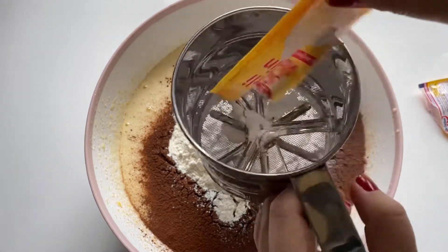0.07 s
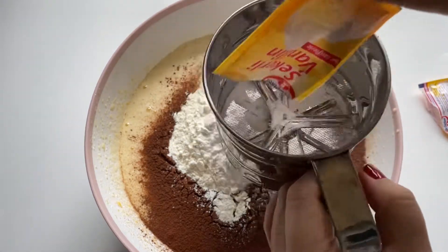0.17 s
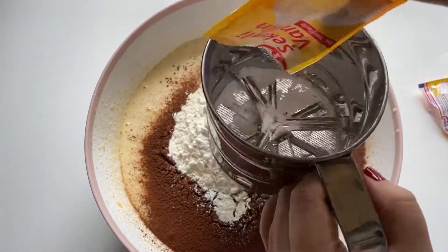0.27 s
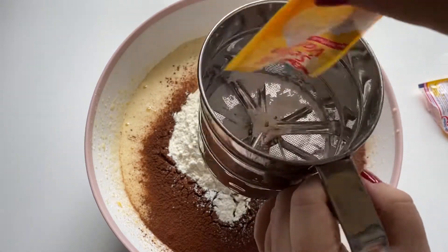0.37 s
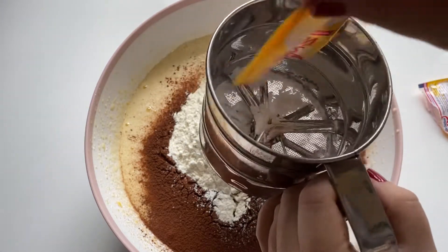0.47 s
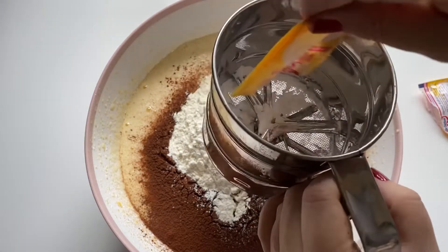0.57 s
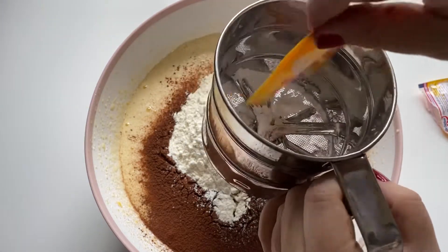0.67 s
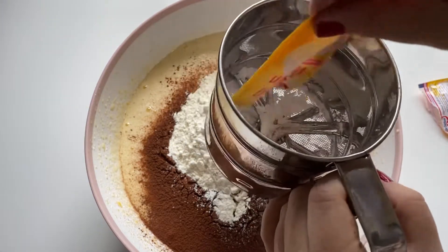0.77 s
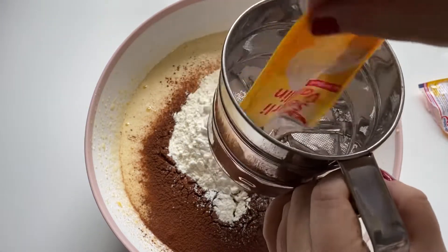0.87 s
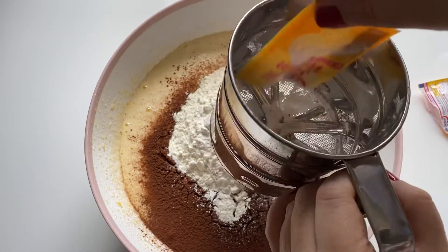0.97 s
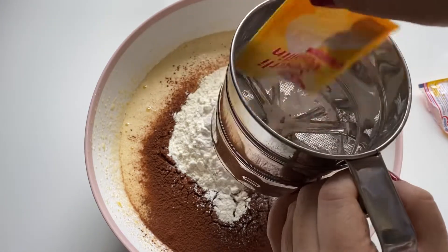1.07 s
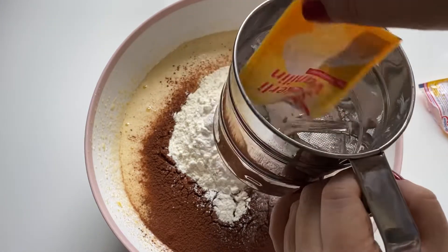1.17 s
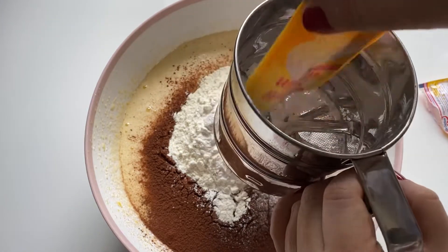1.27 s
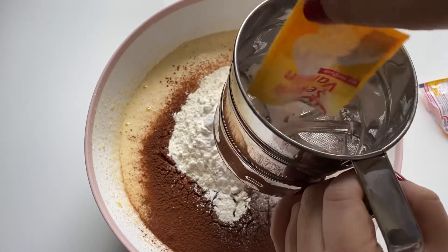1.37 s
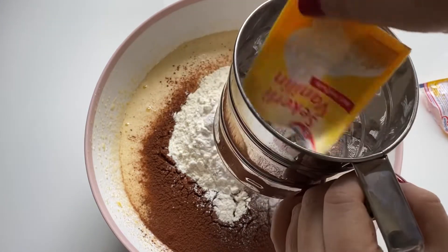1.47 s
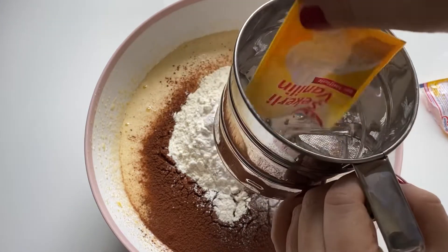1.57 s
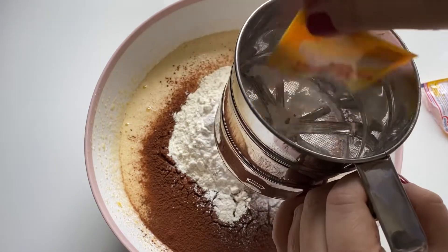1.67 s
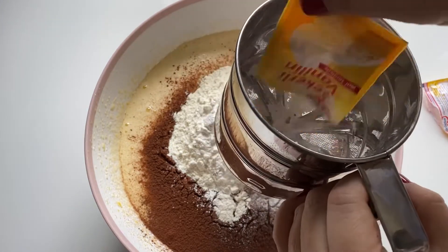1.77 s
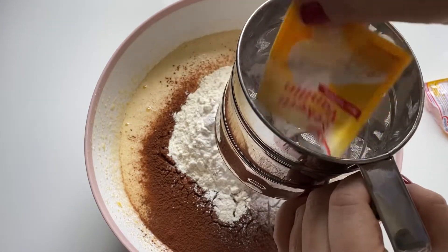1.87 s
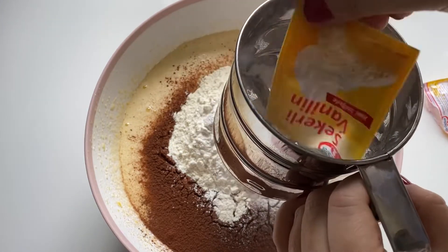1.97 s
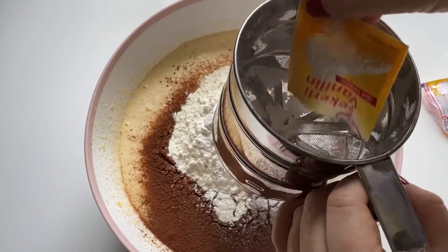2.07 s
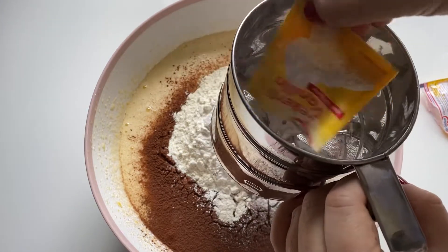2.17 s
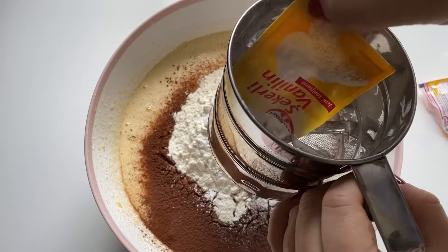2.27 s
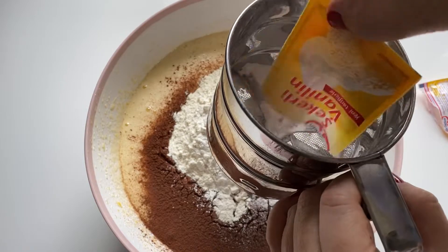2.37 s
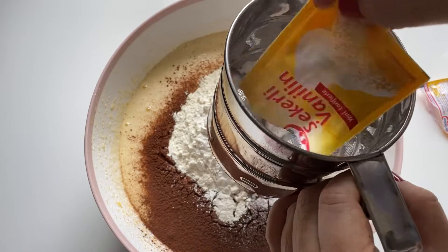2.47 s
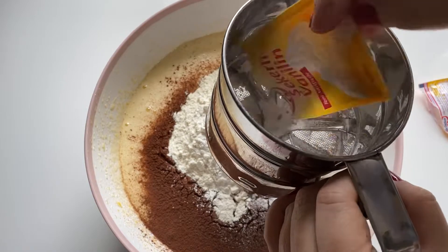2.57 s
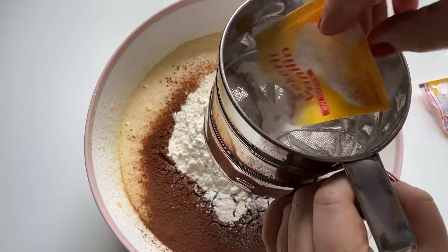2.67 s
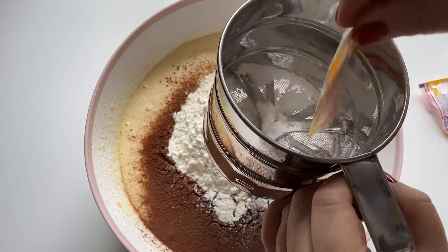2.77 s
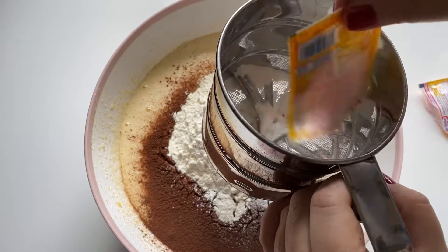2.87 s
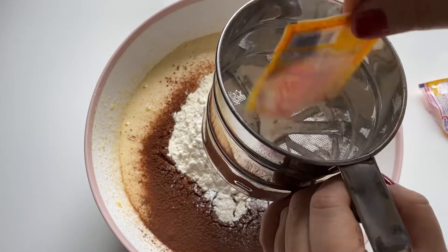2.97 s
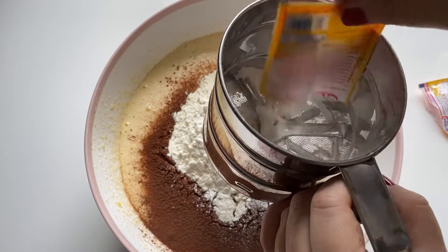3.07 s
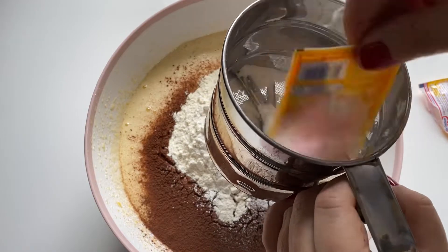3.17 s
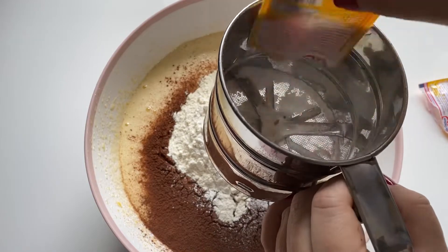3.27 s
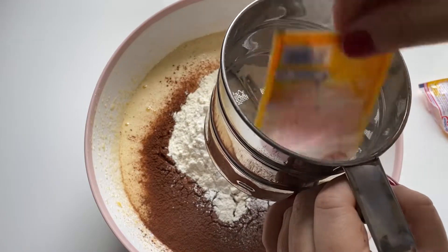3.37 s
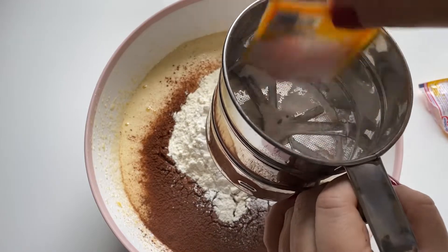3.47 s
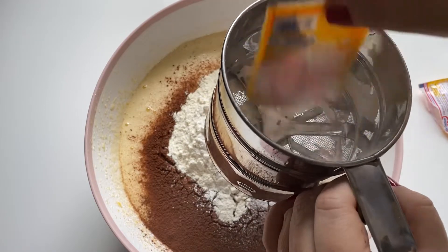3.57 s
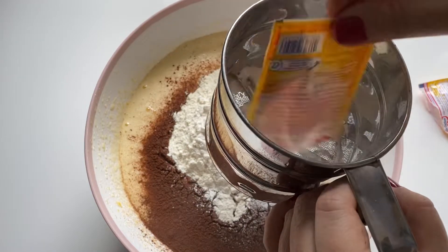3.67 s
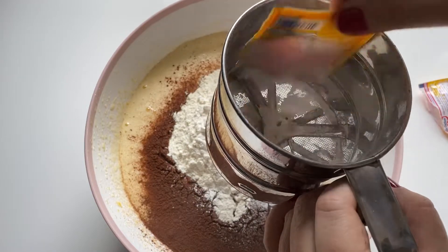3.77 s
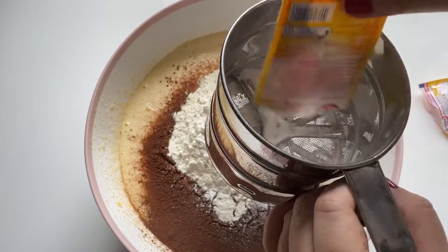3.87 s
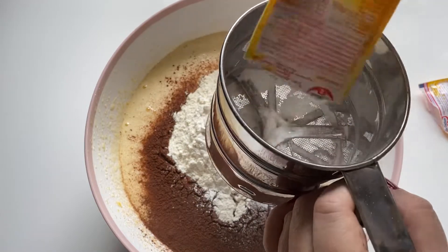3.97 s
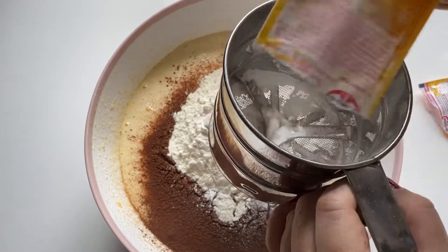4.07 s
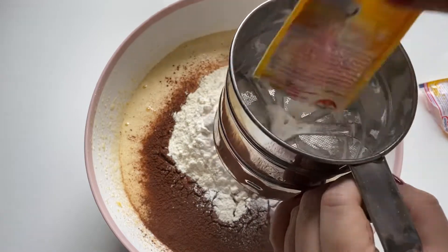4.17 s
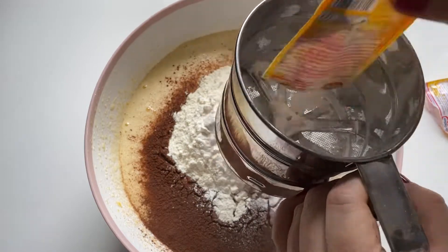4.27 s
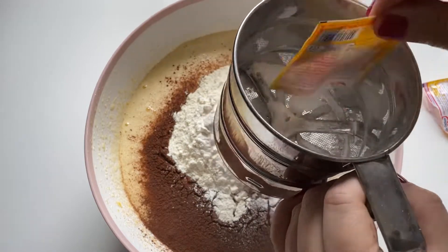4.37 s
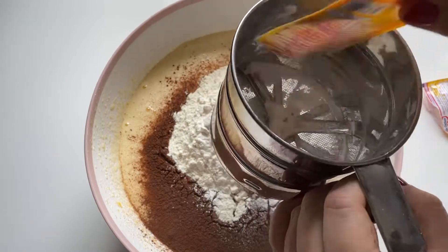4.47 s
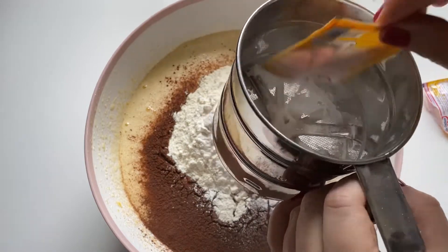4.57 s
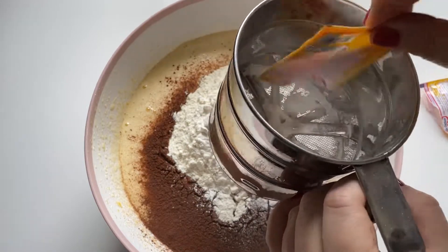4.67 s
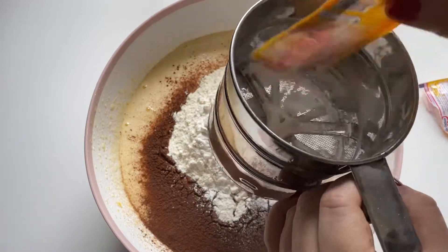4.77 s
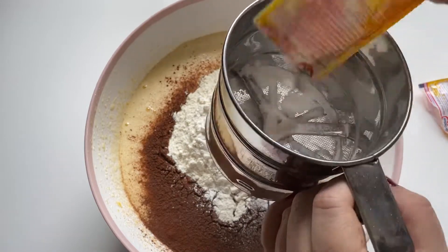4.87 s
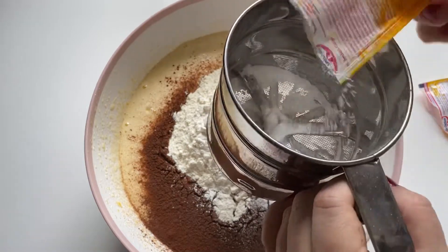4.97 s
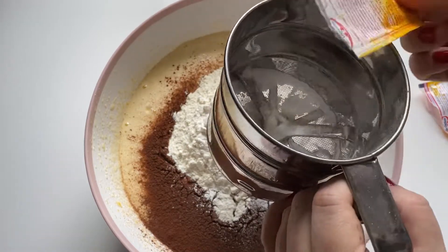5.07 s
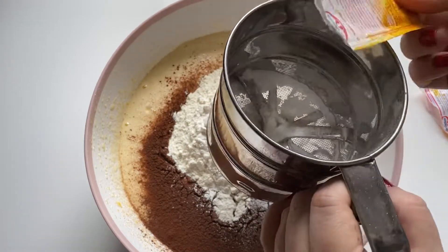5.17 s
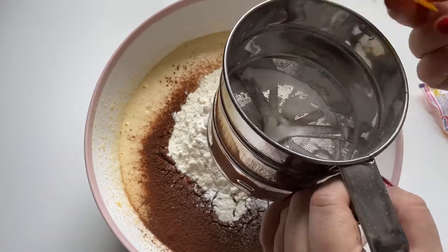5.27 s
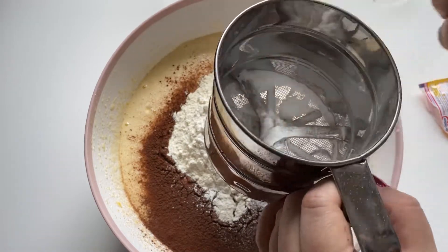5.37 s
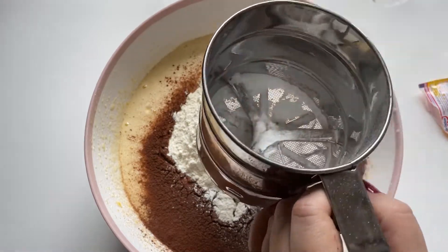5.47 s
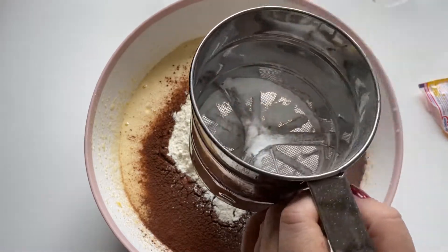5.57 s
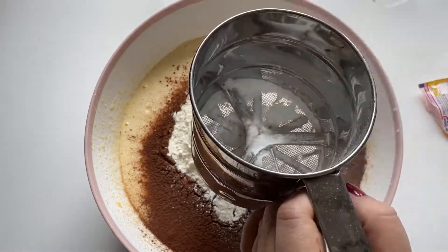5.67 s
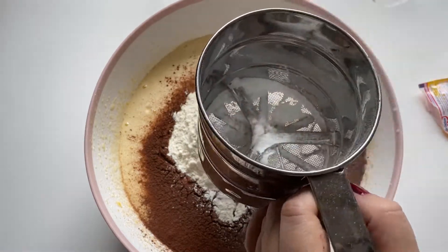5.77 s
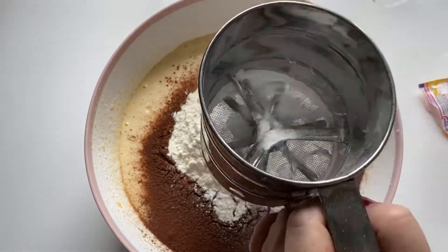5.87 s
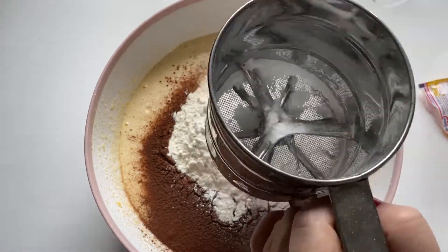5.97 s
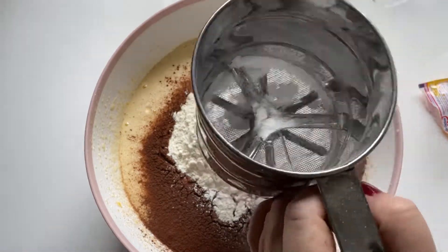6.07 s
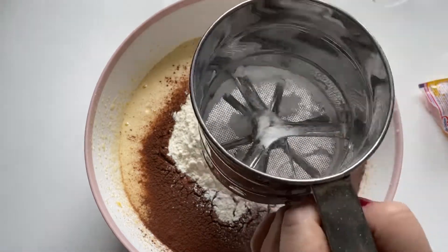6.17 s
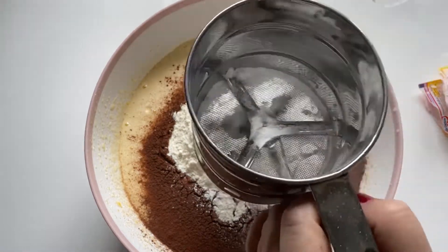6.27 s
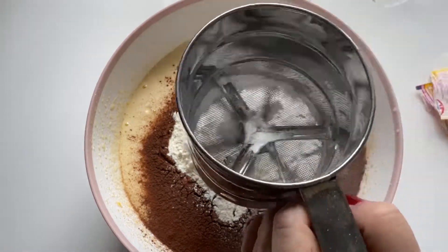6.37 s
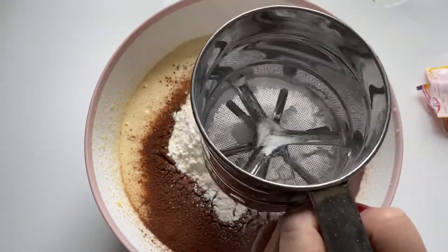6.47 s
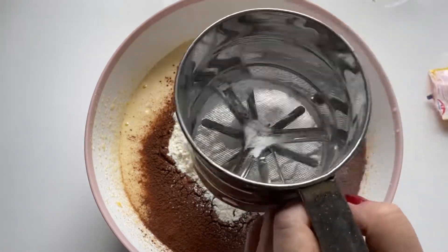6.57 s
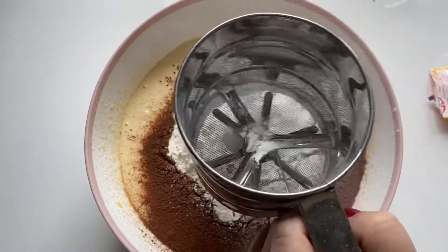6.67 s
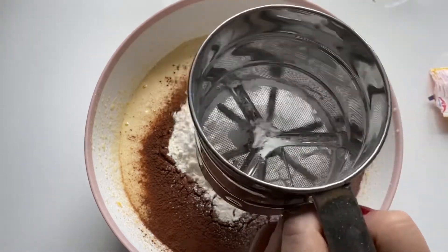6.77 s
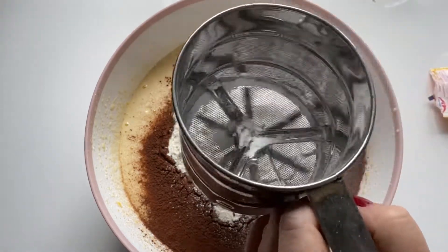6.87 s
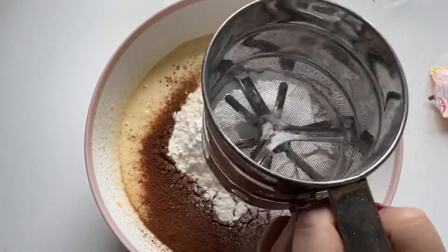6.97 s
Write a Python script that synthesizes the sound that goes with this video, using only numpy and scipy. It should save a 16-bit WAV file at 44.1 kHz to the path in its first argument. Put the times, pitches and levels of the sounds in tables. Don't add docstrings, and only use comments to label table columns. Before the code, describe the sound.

A quiet kitchen with low appliance hum and soft air noise, heard by a very close stereo microphone. From 0 to 0.9 s a paper sachet crinkles lightly with small ticks. From about 0.9 to 1.8 s it is shaken hard: rapid, bright, dry snaps, ragged rustling and a fine hiss of powder. It softens around 1.9 to 2.5 s, with sharp snaps near 2.5 s, then slight handling. From 3.0 to 3.9 s another brisk run of crackling flicks, with low soft puffs of air at about 3.2 and 3.35 s. Gentler, sliding rustles thin out until 5.1 s, leaving near quiet. At 5.8 s the metal sifter starts, far louder: about nine quick gritty rasps of wire on mesh, hard clacks near 6.03, 6.28, 6.55 and loudest at 6.8 s, each with clattering wires and brief steely ringing, then a faint last scrape near 6.9 s.

```python
import sys
import numpy as np
from scipy import signal
from scipy.fft import rfft, irfft, next_fast_len
from scipy.io import wavfile
from scipy.ndimage import uniform_filter1d, map_coordinates

SR = 44100
rng = np.random.default_rng(int(sys.argv[2]) if len(sys.argv) > 2 else 0)


def store_pcm(level_fs):
    pcm = np.round(np.clip(level_fs, -1, 1) * 32767).astype(np.int16)
    wavfile.write(sys.argv[1], SR, np.atleast_2d(pcm).T)


def gain_from_db(level_db):
    decades = np.asarray(level_db, float) / 20
    return 10 ** decades


N = 309582
T = np.arange(N) / SR

# (frequency [Hz], level [dB])
PAPER_COLOUR = [(150, -1.5), (500, -4), (800, 3), (2100, 0), (2800, -1.5), (4800, -0.5), (6300, 1),
                (8000, -27)]
# (frequency [Hz], level [dB])
POWDER_COLOUR = [(5000, -25), (7000, 3), (9500, 0), (12000, -4), (14500, -4), (16000, -10.5)]


def unit(x):
    return x / np.sqrt(np.mean(x ** 2) + 1e-20)


def along(points, hz):
    f, v = np.transpose(points)
    return np.interp(np.log(hz + 1), np.log(f + 1), v)


def filtered(x, response):
    m = next_fast_len(N + SR // 2)
    return irfft(rfft(x, m) * response(np.fft.rfftfreq(m, 1 / SR)), m)[..., :N]


def peak(f, hz, width):
    return 1j * f * width / (hz * hz - f * f + 1j * f * width)


def coloured(x, spectrum):
    return unit(filtered(x, lambda hz: gain_from_db(along(spectrum, hz))))


def wobble(rate):
    return map_coordinates(rng.standard_normal(int(N * rate / SR) + 4), [T * rate])


def grit(spread_db):
    return rng.standard_normal(N) * gain_from_db(spread_db * rng.exponential(size=N))


def add(track, s, sound):
    track[round(s * SR):][:len(sound)] += sound


def snaps():
    # (time [s], peak [dB], panel pitch [Hz], treble edge [dB], low flap [dB])
    creases = [(0.0494, -38, 1090, -17, -3), (0.0569, -30.5, 3500, -4.5, -17),
               (0.0781, -48, 5400, -5, -10.5), (0.1034, -44, 1510, -22, -13),
               (0.3658, -33.5, 3170, -28, -10), (0.4242, -34.5, 4940, -7.5, -28.5),
               (0.4806, -41.5, 1400, -25, -7), (0.489, -44, 4730, 2, -17),
               (0.5943, -42, 1130, -9, -15), (0.6454, -35.5, 1310, -5.5, -16),
               (0.7721, -50.5, 2370, -22, -3), (0.808, -45.5, 1510, -1, -5),
               (0.8343, -39, 5530, -9, -19), (0.8533, -36, 4660, -1, -15),
               (0.858, -42.5, 4720, 2, -17), (0.8705, -30.5, 4820, -5, -25),
               (0.8894, -33, 3540, -5, -27), (0.9115, -35, 2150, -8, -6.5),
               (0.9334, -22.5, 4740, -7, -36), (0.9416, -23.5, 5100, -17, -16),
               (0.9844, -34.5, 4600, -19, -34), (0.9907, -33, 4800, -18, -10),
               (1.0009, -25, 5100, -14, -22), (1.0174, -42, 1290, -12, -16),
               (1.0325, -20, 5850, -1.5, -12), (1.0626, -35.5, 1250, -8, -3),
               (1.0852, -22, 4980, 4, -34), (1.0956, -32, 4300, 0, -19), (1.109, -35, 5620, 9, -18),
               (1.1504, -30.5, 3920, 0, -29), (1.1587, -27, 3300, -0.5, -16.5),
               (1.1644, -24, 5300, -5, -15.5), (1.1738, -24, 980, 4, -8),
               (1.1846, -19, 4930, 1.5, -25), (1.2282, -27.5, 2000, -4, -9.5),
               (1.2366, -23, 5060, -6, -19), (1.2411, -24.5, 3860, 2, -15),
               (1.2945, -42, 2070, -17, -14), (1.3027, -37, 1970, -5, -2),
               (1.3074, -25.5, 2070, -13, -13), (1.3192, -21.5, 4070, -0.5, -10),
                     (1.3566, -23, 2050, -18.5, -15), (1.3657, -26, 2070, 6, -17),
                     (1.3743, -24, 5600, -4, -8), (1.4244, -37, 1430, -16, -13.5),
                     (1.4351, -27, 4740, -8, -25), (1.4396, -19.5, 5050, 3, -10.5),
                     (1.4473, -22.5, 4620, 1.5, -16), (1.4568, -23.5, 4100, -4, -17),
                     (1.51, -14, 5280, -5, -33.5), (1.524, -25, 4180, -3, -11),
                     (1.528, -22, 4870, 0.5, -14.5), (1.56, -27, 3250, -16, -35),
                     (1.5642, -24.5, 4200, -20.5, -14), (1.5766, -23.5, 4500, -7, -7),
                     (1.6229, -26.5, 2050, -5, -18), (1.631, -26, 4540, -7, -6),
                     (1.6431, -25.5, 3970, -5, -19), (1.6809, -26.5, 1760, -9, -9),
                     (1.7052, -19, 5020, -3, -12.5), (1.716, -30, 4630, -18, -13),
                     (1.7575, -34.5, 1400, -8, -4), (1.772, -27, 5060, 6, -25),
                     (1.832, -21, 2050, -2, -16.5), (1.9514, -32.5, 2090, 5, -7),
                     (2.0974, -46.5, 5160, 6, -22), (2.2273, -40, 5600, -12.5, -16),
                     (2.231, -40.5, 5340, -13, -11), (2.2837, -47, 2000, -5.5, -2.5),
                     (2.334, -33.5, 5280, -1, -1), (2.344, -43.5, 2030, -8, -13.5),
                     (2.3484, -35.5, 5270, -6, -6.5), (2.469, -39.5, 2090, -16, -9.5),
                     (2.5207, -23, 4000, 0, -12), (2.5265, -36.5, 1290, -16.5, -7.5),
                     (2.5454, -19, 5750, 9, -25.5), (2.556, -30, 5680, -6, -1),
                     (2.594, -36, 4730, -4, -21.5), (2.6696, -31.5, 4300, -11, -12),
               (2.683, -45, 5560, 1, -13), (2.6899, -36.5, 3770, -10, -11.5),
                    (2.7, -45, 3210, 1.5, -14.5), (2.7105, -47.5, 4890, 8, -7),
                    (2.822, -48.5, 2110, -20, -10), (2.8289, -43, 2100, -24.5, -3.5),
                    (2.8544, -53, 5530, 12.5, -7.5), (2.8634, -43, 3900, 6.5, -18.5),
                    (2.8827, -32.5, 4500, -4, -6.5), (2.896, -34.5, 1400, -13, -5),
                    (2.913, -45.5, 4610, 6.5, -13), (2.925, -36.5, 970, -11.5, -11),
                    (2.983, -37.5, 1520, -17, -8.5), (2.987, -37.5, 2180, -10, -11.5),
                    (2.988, -42.5, 5860, -8, -13), (3.0016, -43, 5950, 0, -6),
                    (3.0152, -35.5, 3740, 2.5, -18), (3.043, -38, 4570, -7, -20.5),
                    (3.0472, -19.5, 4370, 3.5, -31), (3.0625, -20.5, 2060, -3.5, -19),
                    (3.0702, -15, 4560, -6, -31.5), (3.1077, -29, 5730, 0.5, -16.5),
                    (3.1161, -24.5, 5700, 5, -26), (3.159, -36, 1370, -17, -15),
                    (3.1695, -26, 5000, -5.5, -15), (3.176, -42.5, 1360, -12, -2),
                    (3.181, -41, 1210, -12, -7), (3.1867, -44, 910, -18, -6),
                    (3.1931, -28.5, 4450, -1.5, -16.5), (3.253, -25.5, 3150, -6.5, -15.5),
                    (3.2637, -34, 3230, 4.5, -7.5), (3.284, -28.5, 5600, 1.5, -21.5),
                    (3.3413, -27, 5600, -5, -8), (3.3556, -28, 5760, -1, -15.5),
                    (3.3703, -30, 5020, -2, -16), (3.3877, -35, 6100, -5, -14),
                    (3.4127, -23.5, 4630, 0.5, -7), (3.4199, -23.5, 3320, -2, -9),
                    (3.451, -36, 1530, -14, -10),
               (3.5094, -30, 5960, 2, -8), (3.5147, -30, 5020, 2, -19), (3.5257, -32.5, 5200, 0, -21),
                    (3.578, -43, 900, -18, -11), (3.5838, -27, 3000, 5, -26), (3.607, -37, 1250, -16, -6),
                    (3.6459, -27, 5500, -2, -14), (3.6596, -33.5, 1400, -10, 3),
                    (3.6639, -29, 4220, -14, -21), (3.6684, -23.5, 4970, -6, -13.5),
                    (3.7269, -27.5, 1920, -1, -20), (3.7399, -25, 5670, -17, -8),
                    (3.7878, -45, 5200, -7, -17), (3.793, -38, 1360, -15, -9), (3.8064, -26, 4440, -3, -31),
                    (3.8123, -36, 1350, -9, -18), (3.8573, -33, 4550, -18, -17),
                    (3.8735, -27.5, 4580, 6.5, -9), (3.8928, -35, 4500, -2, -8),
                    (3.9611, -34.5, 1530, -23.5, -10), (4.031, -54, 2410, -15, -11),
                    (4.08, -44, 900, -4, 0.5), (4.095, -40, 2330, -15, -4.5), (4.1836, -40, 1690, -16, -4),
                    (4.1923, -39.5, 5620, -9, -11), (4.2141, -37.5, 4760, -5, -20),
                    (4.2937, -50, 1410, -15, -11), (4.3432, -33, 2150, 3, -21),
                    (4.421, -40.5, 3320, 1.5, -16), (4.4792, -30.5, 5900, -16, -17),
                    (4.497, -30.5, 4830, 6.5, -19), (4.5096, -30.5, 5440, -11, -15.5),
                    (4.5744, -44, 900, -3, 2), (4.891, -30.5, 4900, -26, -8.5),
                    (4.912, -45.5, 3100, -5, -7), (5.0101, -30.5, 1760, -11.5, -15),
                    (5.089, -56, 1730, -18, -1), (5.5496, -64.5, 1030, 12.5, -4)]
    # (frequency [Hz], level [dB])
    flap_colour = [(200, -8), (400, -8), (800, 0.5), (1300, -6.5), (2000, -19.5)]
    out, t = np.zeros(N + SR), np.arange(SR // 40) / SR
    body = coloured(grit(spread_db=2.0), PAPER_COLOUR)
    body = unit(filtered(body, lambda f: f ** 2 / (f ** 2 + 1600 ** 2)))
    edge = coloured(grit(spread_db=3.5), POWDER_COLOUR)
    flap = coloured(grit(spread_db=1.1), flap_colour)
    rise = 1 - np.exp(-t / 0.00025)
    burst = gain_from_db(-60 * t / 0.0098) + gain_from_db(-17.0 - 60 * t / 0.023)
    edge_fade = burst + gain_from_db(5.5 - 60 * t / 0.005)
    flap_fade = gain_from_db(-60 * t / 0.018)
    for s, db, hz, edge_db, flap_db in creases:
        here = slice(round(s * SR), round(s * SR) + len(t))
        ratio = 0.8 + 0.39 * rng.uniform()
        tones = np.sin(2 * np.pi * hz * t) + 0.29 * np.sin(2 * np.pi * hz * ratio * t)
        tone_t60 = 0.0071 * (4500 / max(hz, 2000)) ** (0.62 * (hz > 1700))
        tones = gain_from_db(-0.5 - 60 * t / tone_t60) * tones
        body_db = -4.0 + 3 * np.log2(hz / 4500)
        sheet = burst * gain_from_db(body_db) * body[here]
        sheet = sheet + gain_from_db(flap_db - 1.5) * flap_fade * flap[here]
        sharp = gain_from_db(edge_db - 5.5) * edge_fade * edge[here]
        add(out, s, gain_from_db(db + 1) * rise * (tones + sheet + sharp))
    return out[:N]


def rustle():
    # (time [s], paper level [dB], powder over paper [dB])
    handling = [(0.0, -57.5, -9.5), (0.73, -79, 2), (1.08, -49, -11.5), (1.57, -60, -0.5),
                (1.94, -58.5, -3), (2.5, -60.5, -7), (2.83, -65.5, 3.5), (3.18, -65.5, 4.5),
                (3.8, -60, 0.5), (4.05, -74.5, 0), (4.52, -64, 2), (4.8, -61, -1.5), (5.1, -75, -0.5),
                (5.25, -73, -0.5), (5.45, -76, 0), (5.63, -73.5, 2), (5.72, -75.5, 1.5), (5.8, -63, -6)]
    # (start [s], length [s], crinkle level [dB])
    flicks = [(0.037, 0.037, -45), (0.378, 0.016, -62), (0.42, 0.017, -66), (0.484, 0.025, -46),
              (0.594, 0.011, -41), (0.633, 0.09, -53), (0.828, 0.062, -48), (0.917, 0.03, -44),
              (0.995, 0.03, -42), (1.059, 0.035, -39.5), (1.151, 0.025, -32), (1.217, 0.016, -42.5),
              (1.312, 0.021, -45), (1.369, 0.039, -44), (1.426, 0.044, -35), (1.513, 0.031, -32.5),
              (1.566, 0.019, -37), (1.621, 0.034, -34), (1.7, 0.021, -27.5), (1.77, 0.015, -42),
              (1.826, 0.025, -43), (1.947, 0.029, -47), (2.09, 0.093, -59), (2.185, 0.14, -55),
              (2.32, 0.031, -51),
              (2.515, 0.066, -39.5), (2.66, 0.077, -51), (2.871, 0.077, -43), (2.981, 0.048, -43),
                   (3.041, 0.047, -31.5), (3.1, 0.011, -45.5), (3.164, 0.028, -38), (3.249, 0.041, -44),
                   (3.338, 0.024, -31.5), (3.412, 0.029, -37.5), (3.507, 0.026, -34), (3.581, 0.018, -31),
                   (3.653, 0.034, -40), (3.727, 0.03, -38.5), (3.787, 0.033, -37), (3.863, 0.06, -51),
                   (3.937, 0.051, -54.5), (4.081, 0.062, -57), (4.178, 0.084, -47), (4.341, 0.049, -52.5),
                   (4.408, 0.042, -53), (4.474, 0.11, -44.5), (4.639, 0.087, -47.5), (4.848, 0.078, -50),
                   (4.998, 0.034, -55.5)]
    s, paper_db, hiss_db = np.transpose(handling)
    flow_swing_db = 3
    paper_swing_db = 0.79 * wobble(27) + flow_swing_db * wobble(7.6) + 2.6 * wobble(200)
    paper = gain_from_db(np.interp(T, s, paper_db) - 7.0 + paper_swing_db)
    powder = gain_from_db(np.interp(T, s, paper_db + hiss_db) + flow_swing_db * wobble(21.0))
    ragged_db = 2.5 * wobble(40) + 3.6 * wobble(260)
    for start, length, db in flicks:
        here = slice(round((start - .006) * SR), round((start + length + 0.086) * SR))
        soft = np.clip((-41.5 - db) / 4.3, 0, 1)
        full = 0.0012 + 0.3 * soft * length
        times = [-.004, full, 0.94 * length, length + 0.0057, length + 0.041]
        swell_db = db - 5.0 + np.interp(T[here] - start, times, [-16, 2.0, -4.5, -18.5, -40.0])
        rough = np.clip((db + 55.5) / 14, .55, 1)
        paper[here] += gain_from_db(swell_db + rough * (ragged_db[here] - 3.5))
        pour_db = -14 + 11.5 * soft
        powder[here] += gain_from_db(swell_db + pour_db + rough * (1.9 * ragged_db[here] - 2.0))
    sheet = coloured(grit(spread_db=2.5), PAPER_COLOUR)
    sheet = filtered(sheet, lambda f: 1 + gain_from_db(-1) * peak(f, 2070, 200))
    crisp = filtered(sheet, lambda f: f ** 4 / (f ** 4 + 2100.0 ** 4))
    sheet = sheet + (gain_from_db(-0.5 + 3.5 * wobble(12)) - 1) * crisp
    return paper * gain_from_db(-1.48) * sheet + powder * coloured(grit(spread_db=2.5), POWDER_COLOUR)


def puffs():
    # (time [s], peak [dB], pitch [Hz])
    pushes = [
        (1.841, -46, 54),
        (2.999, -48, 46.2),
        (3.17, -34, 51.7),
        (3.343, -33, 56.3),
        (3.511, -40, 54),
    ]
    out, t = np.zeros(N + SR), np.arange(SR // 8) / SR
    for s, db, hz in pushes:
        cycles = hz * (t + 0.024 * (1 - np.exp(-t / 0.0034)))
        low = gain_from_db(db - 60 * t / 0.13) * np.sin(2 * np.pi * cycles)
        high = gain_from_db(db - 4.5 - 60 * t / 0.058) * np.sin(2 * np.pi * 3.5 * cycles)
        add(out, s, low + high)
    return out[:N]


def wheel():
    # (start [s], fastest [s], end [s], level [dB])
    strokes = [
        (5.78, 5.851, 5.94, -26),
        (5.98, 6.018, 6.11, -26.5),
        (6.083, 6.121, 6.176, -24.5),
        (6.234, 6.253, 6.4, -28),
        (6.344, 6.376, 6.51, -25.5),
        (6.503, 6.536, 6.59, -27),
        (6.591, 6.649, 6.71, -24.5),
        (6.743, 6.792, 6.81, -21.5),
        (6.85, 6.883, 6.99, -31.5),
    ]
    drag = np.zeros(N)
    for start, fastest, end, db in strokes:
        speed = np.interp(T, [start, fastest, end], [0, 1, 0])
        drag += gain_from_db(db) * np.sin(np.pi / 2 * speed) ** 4.44
    fade = gain_from_db(-60 / (.6 * SR))
    settling = signal.lfilter([1 - fade], [1, -fade], drag)
    uneven = gain_from_db(1.0 + 0.94 * wobble(280) + 1.7 * wobble(60))
    return (drag + gain_from_db(-18.0) * settling) * uneven * unit(grit(spread_db=2.1))


def stops():
    # (time [s], peak [dB], stop-bar share [dB])
    contacts = [(5.873, -12.5, -5), (6.0037, -19, -13), (6.0317, -5, 3), (6.172, -10.5, -25),
                (6.2543, -9.5, -11), (6.276, -4.5, 1.5), (6.3536, -16, -36), (6.419, -19.5, -2),
                (6.5276, -13.5, -8), (6.5496, -4.5, -1.5), (6.794, -2.5, -1), (6.875, -20.5, -28),
                (6.9148, -20.5, -28)]
    # (pitch [Hz], level [dB], time to die by 60 dB [s])
    bar_tones = [(5680, 1.5, 0.013), (5960, -3, 0.015), (994, -25.5, 0.034), (3770, -32, 0.013),
                 (228, -37, 0.074), (375, -33, 0.033)]
    bar, rattle, t = np.zeros(N + SR), np.zeros(N + SR), np.arange(SR // 5) / SR
    swell = 1 - np.exp(-(t / 0.0009) ** 2)
    song = swell * sum(gain_from_db(db - 60 * t / t60) * np.sin(2 * np.pi * hz * t) for hz, db, t60 in bar_tones)
    clap = gain_from_db(-10 - 60 * t / 0.0029)
    clatter = gain_from_db(-15 - 60 * np.maximum(t - 0.0027, 0) / 0.043)
    rattle_fade = clap + clatter + gain_from_db(-18.0 - 60 * t / 0.12)
    for s, db, share_db in contacts:
        add(bar, s, gain_from_db(db + share_db + 3.5) * song)
        add(rattle, s, gain_from_db(db) * rattle_fade)
    return bar[:N], rattle[:N] * unit(grit(spread_db=1.5))


def cup(x, ring_db, count=4):
    # (pitch [Hz], width [Hz], level [dB])
    wall_modes = [(1158, 34, 8.5), (1446, 28, 12), (1870, 45, 7), (2353, 38, 8), (2428, 40, 7),
                  (3418, 25, 6), (3622, 26, 9), (3700, 45, 4), (4200, 45, 3), (5002, 35, 4), (5300, 130, 2),
                  (5911, 45, 4), (9454, 140, 1), (9825, 80, 2)]
    # (frequency [Hz], level [dB])
    mesh_colour = [(70, -58.5), (150, -11), (500, -20), (1000, -13), (2000, -5.5), (4000, -7.5), (5700, -4),
                   (8000, -1), (10000, -6), (13000, -3), (15500, -9)]
    spots, shifts = rng.standard_normal((2, len(wall_modes), count, 1))
    spots_db = 3 * (spots - spots.mean(axis=1, keepdims=True))

    def response(f):
        ring = 1
        for (hz, width, db), spot_db, shift in zip(wall_modes, spots_db, shifts):
            ring = ring + gain_from_db(db + ring_db + spot_db) * peak(f, hz * (1 + .0025 * shift), width)
        return gain_from_db(along(mesh_colour, f)) * ring

    share = gain_from_db(10 * np.array([wobble(14) for _ in range(count)]))
    return filtered(x * share / np.linalg.norm(share, axis=0), response).sum(axis=0)


def sifter():
    bar, rattle = stops()
    return bar + cup(wheel() + rattle, ring_db=-.8)


def nearby(x, t60, size=2048):
    pieces = np.pad(x, (0, -N % size)).reshape(-1, size)
    echoes = rng.standard_normal((2, *pieces.shape)) * gain_from_db(-60 * np.arange(size) / SR / t60)
    wet = signal.fftconvolve(pieces[None], echoes / np.linalg.norm(echoes[0, 0]), axes=2)
    wet = np.pad(wet, ((0, 0), (0, 0), (0, 1)))
    wet[:, 1:, :size] += wet[:, :-1, size:]
    return wet[..., :size].reshape(2, -1)[:, :N]


def tail(t60s, seconds):
    hz, t, z = signal.stft(rng.standard_normal((2, int(SR * seconds))), SR, nperseg=256)
    pair = signal.istft(z * gain_from_db(-60 * t / along(t60s, hz)[:, None]), SR, nperseg=256)[1]
    return pair / np.linalg.norm(pair[0])


def space(x):
    # (frequency [Hz], level [dB])
    apart = [(100, -25.5), (300, -13.5), (650, -2.5), (1300, -8), (1800, -12), (3000, -2), (5000, -6.5),
             (7200, -13), (10000, -10), (13500, -12.5)]
    # (frequency [Hz], time to die by 60 dB [s])
    room = [(200, 0.88), (2000, 0.56), (10000, 0.066)]
    far = signal.fftconvolve(np.pad(x, (300, 0))[None], tail(room, 0.38), axes=1)[:, :N]
    echoes = nearby(x, t60=0.026) + gain_from_db(-10.0) * far
    return x + filtered(echoes, lambda hz: gain_from_db(along(apart, hz)))


def kitchen():
    # (frequency [Hz], level per Hz [dB])
    air_colour = [(25, -31), (45, 0.5), (100, -1), (200, -6), (400, -10), (550, -19), (1100, -27),
                  (2000, -35.5), (5000, -45.5), (9000, -58)]
    # (pitch [Hz], waver [Hz], level [dB])
    hum_tones = [(84.2, 1.6, -55.5), (46.3, 1.1, -67), (154, 3, -64), (340.6, 8, -70), (1007, 15, -83.5),
                 (1400, 12, -85)]
    # (frequency [Hz], likeness [0 to 1])
    far_alike = [(60, 1.0), (240, 0.91), (950, 0), (3770, 0.66), (15000, 0.11)]

    def response(hz):
        turn = np.arccos(np.clip(along(far_alike, hz), 0, 1)) / 2
        return gain_from_db(along(air_colour, hz)) * [np.cos(turn), np.sin(turn)]

    mid, side = filtered(rng.standard_normal((2, N)), response)
    hum = np.zeros(N)
    for hz, waver, db in hum_tones:
        cycles = np.cumsum(hz + waver * wobble(25)) / SR
        hum += gain_from_db(db + 2.6 * wobble(5.7)) * np.sin(2 * np.pi * cycles)
    return gain_from_db(-59 + 0.87 * wobble(2.1)) * unit(np.array([mid + side, mid - side])) + hum


def scene():
    # (frequency [Hz], left minus right [dB])
    tilt = [(60, 0.5), (240, -1.5), (950, -2), (3770, -1), (15000, 0.5)]
    # (frequency [Hz], lead [radians])
    lead = [(0, 0), (780, 0), (1380, -.4), (2760, .9), (3500, .6), (4900, -.1), (6300, 2.2), (7400, 3.14),
            (10400, 6.28), (13700, 9.42), (16700, 13)]
    near = space(sifter() + snaps() + rustle()) + puffs()

    def port(hz):
        return gain_from_db(along(tilt, hz) / 2) * np.exp(.5j * np.interp(hz, *np.transpose(lead)))

    return filtered(near, lambda hz: port(hz) ** [[1], [-1]]) + kitchen()


def joint_stereo(x, gap_db, jump_db, size=8):
    hz, _, z = signal.stft(np.array([x[0] + x[1], x[0] - x[1]]) / 2, SR, nperseg=1024)
    power = (np.abs(z[:, :-1]) ** 2).reshape(2, -1, size, z.shape[2]).sum(axis=2)
    total = power[:, len(power[0]) // 8:].sum(axis=(0, 1))
    steady = total < gain_from_db(2 * jump_db) * np.roll(total, 2)
    quiet = total < gain_from_db(-54) * total.max()
    halved = (hz[:-1:size, None] > 12000) & quiet
    smooth = uniform_filter1d(power, size=3)
    weak = smooth < gain_from_db(-2 * gap_db / (1 + halved)) * smooth[::-1]
    z[:, :-1] *= ~(np.repeat(weak & steady, size, axis=1) & (hz[:-1, None] > 6300))
    mid, side = signal.istft(z, SR, nperseg=1024)[1][:, :N]
    return np.array([mid + side, mid - side])


def roll_off(x):
    return signal.sosfilt(signal.butter(12, 17140, fs=SR, output="sos"), x)


def record(dry):
    rounded = dry / (1 + np.abs(dry / .95) ** 6) ** (1 / 6)
    edge_hz, edge_db = [15780, 16050, 17000, 17200], [0, -30, -48, -95]
    band = filtered(rounded, lambda hz: gain_from_db(np.interp(hz, edge_hz, edge_db)))
    mix = joint_stereo(band, gap_db=7.0, jump_db=9)
    return roll_off(mix)


dry = scene()
out = record(dry)
store_pcm(out)
```